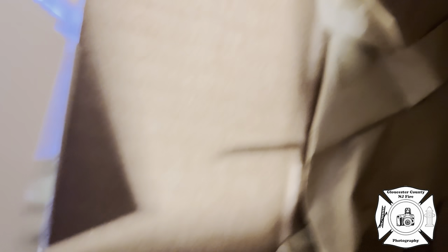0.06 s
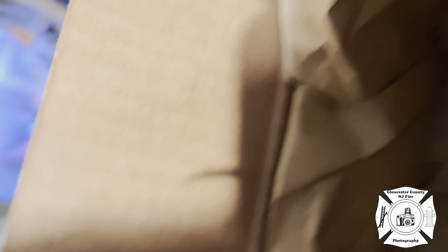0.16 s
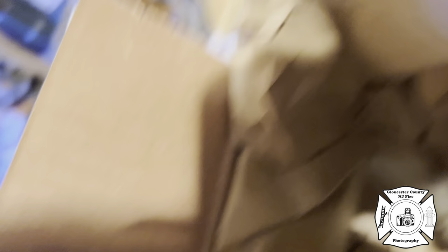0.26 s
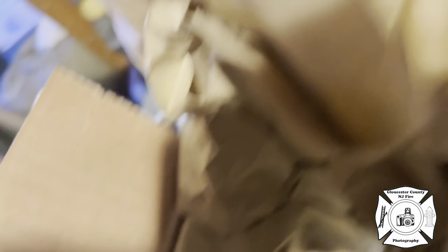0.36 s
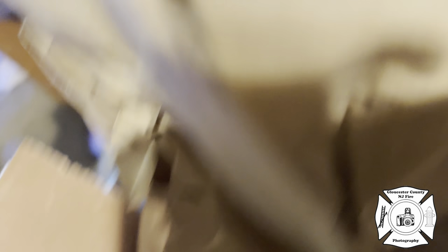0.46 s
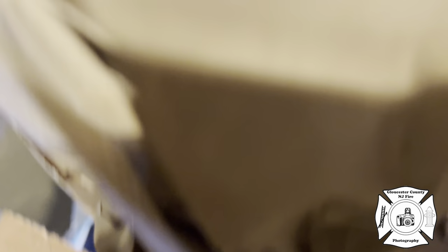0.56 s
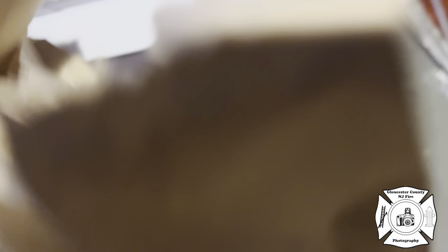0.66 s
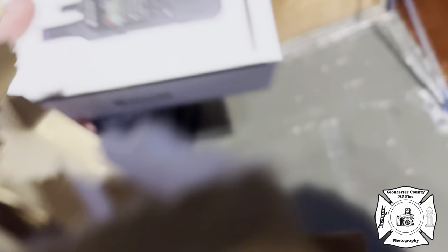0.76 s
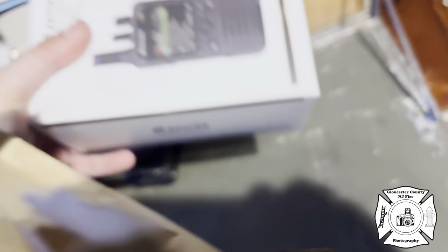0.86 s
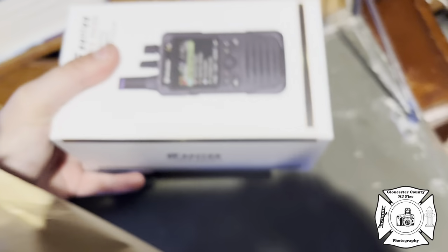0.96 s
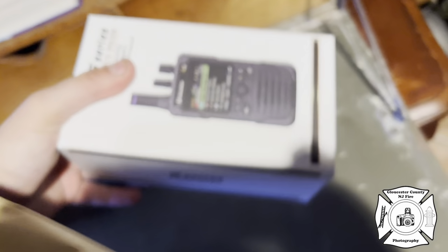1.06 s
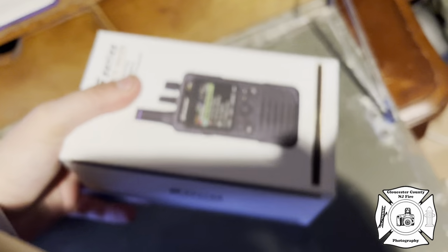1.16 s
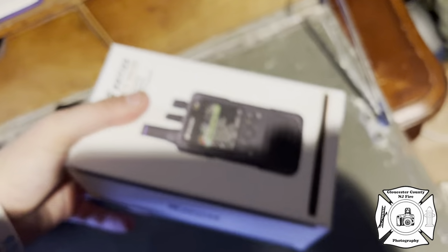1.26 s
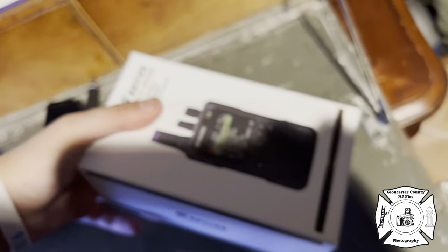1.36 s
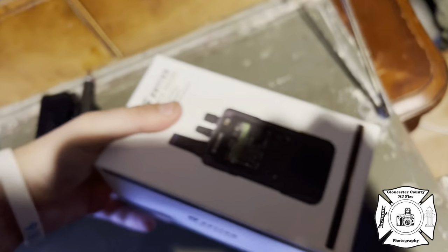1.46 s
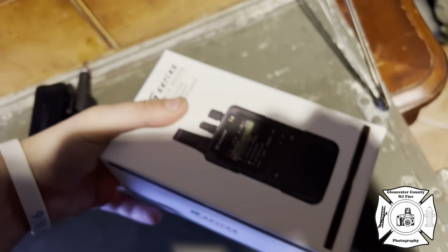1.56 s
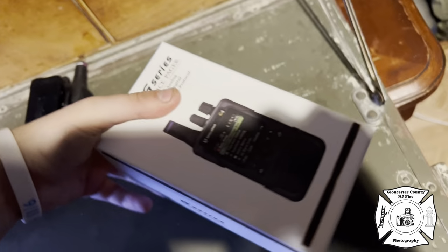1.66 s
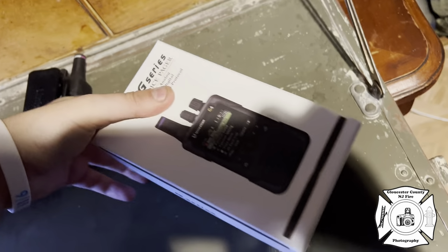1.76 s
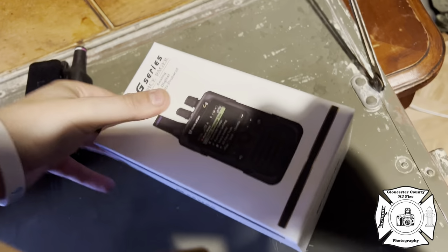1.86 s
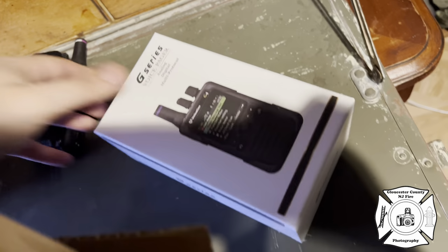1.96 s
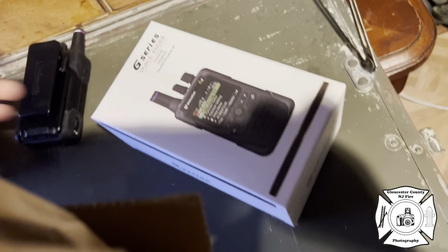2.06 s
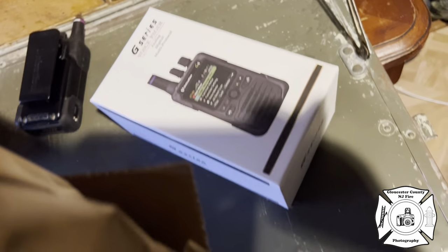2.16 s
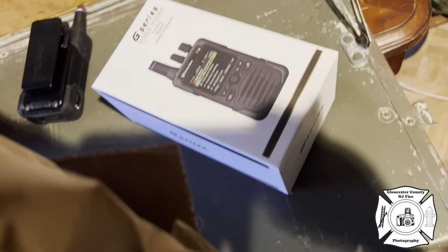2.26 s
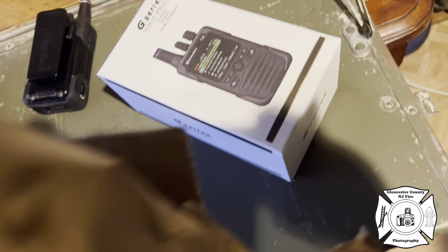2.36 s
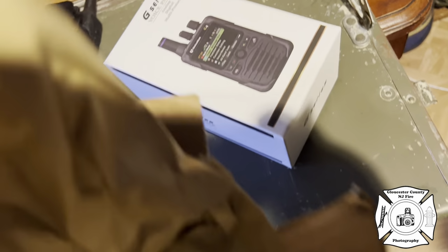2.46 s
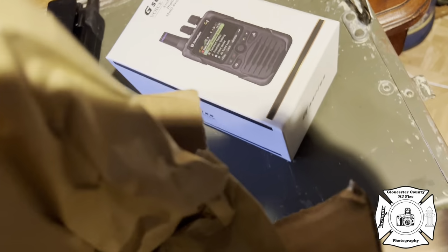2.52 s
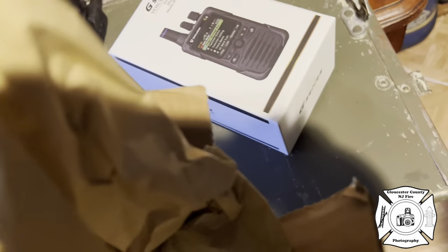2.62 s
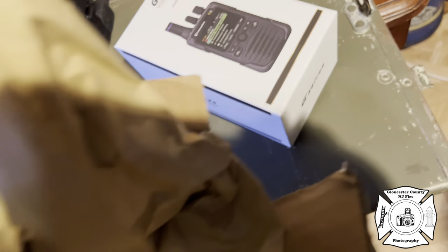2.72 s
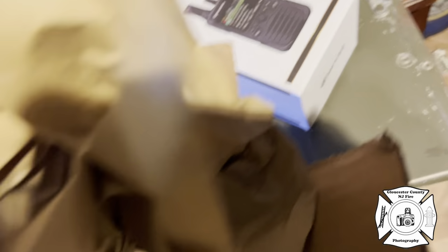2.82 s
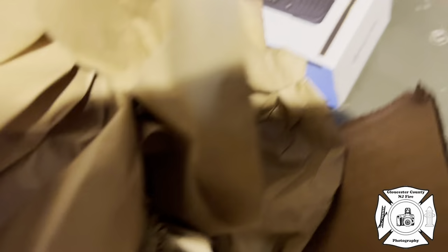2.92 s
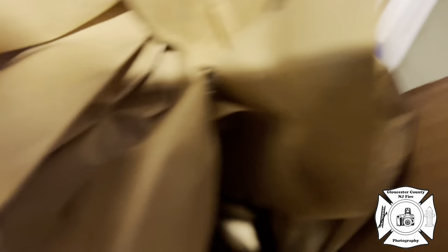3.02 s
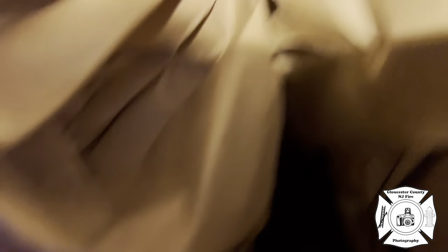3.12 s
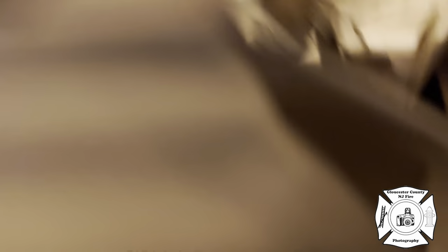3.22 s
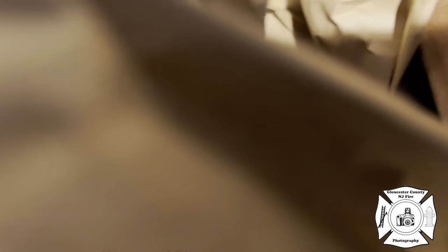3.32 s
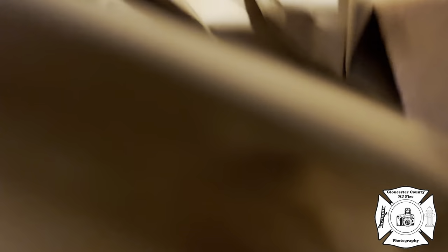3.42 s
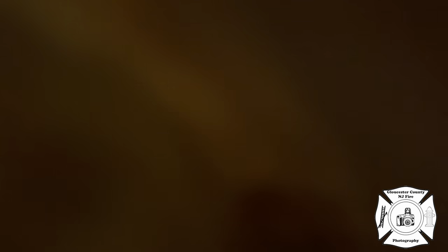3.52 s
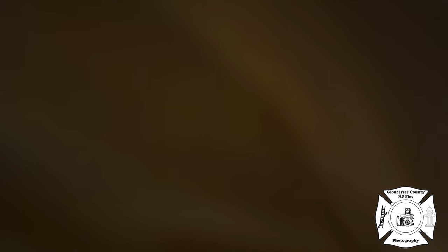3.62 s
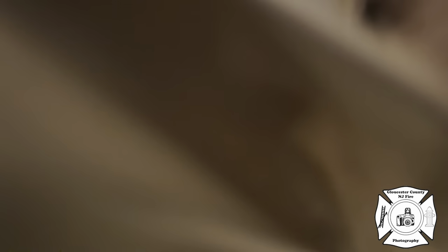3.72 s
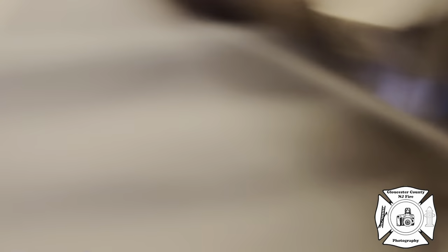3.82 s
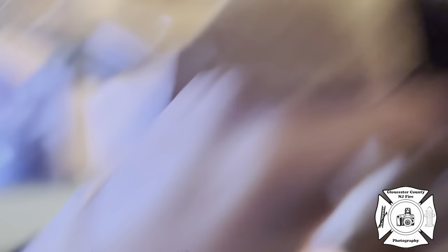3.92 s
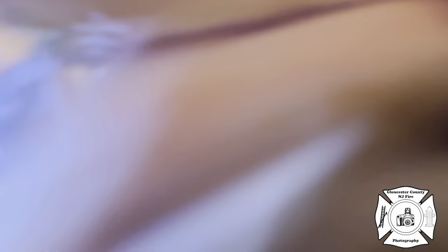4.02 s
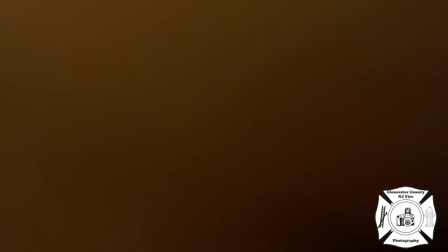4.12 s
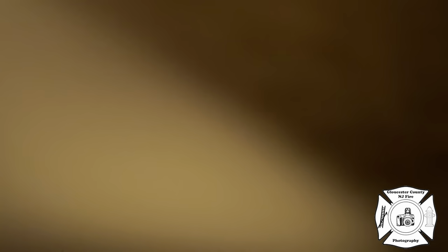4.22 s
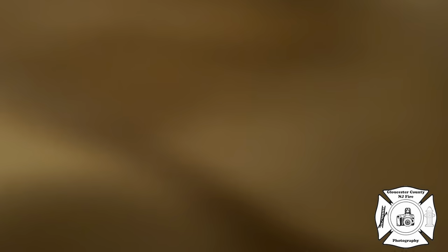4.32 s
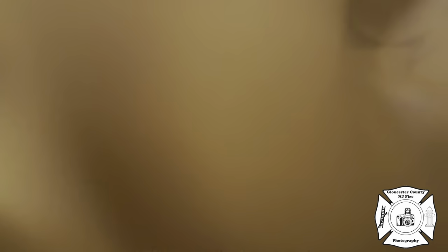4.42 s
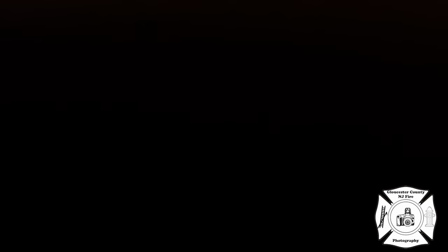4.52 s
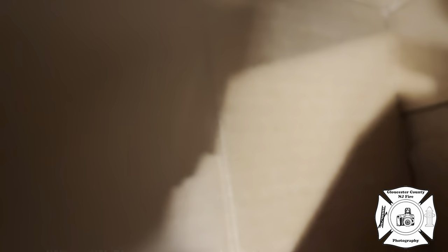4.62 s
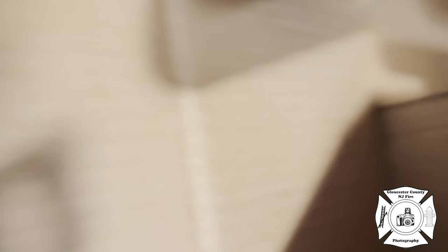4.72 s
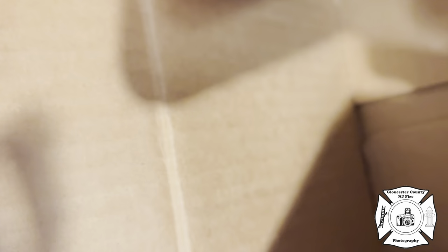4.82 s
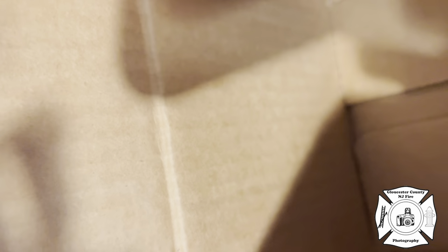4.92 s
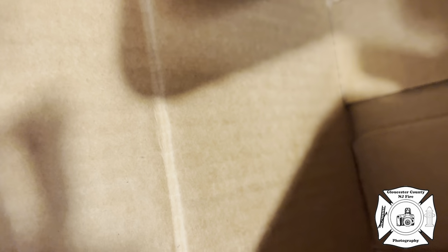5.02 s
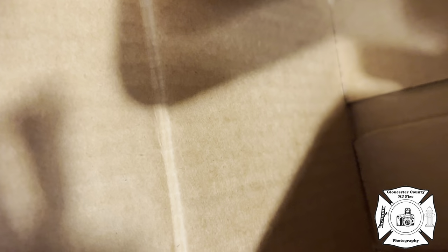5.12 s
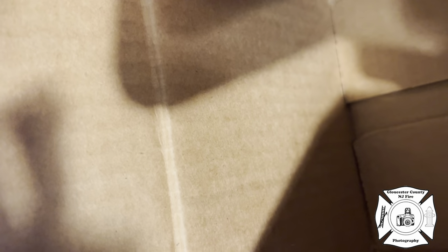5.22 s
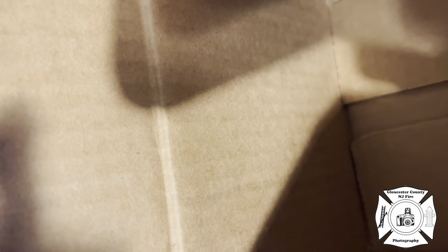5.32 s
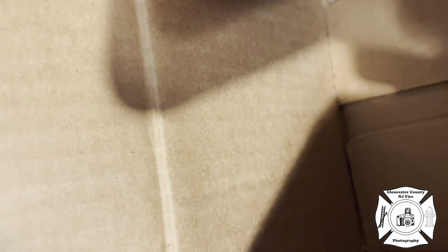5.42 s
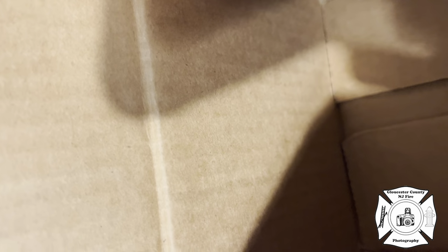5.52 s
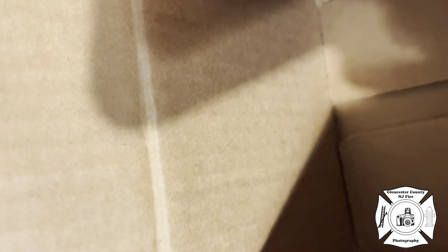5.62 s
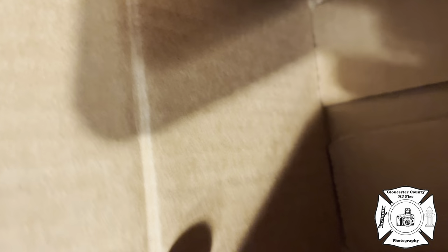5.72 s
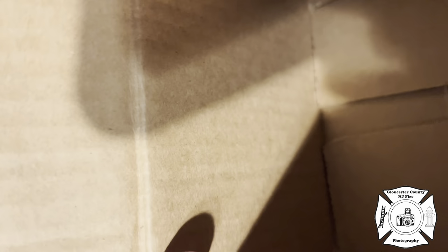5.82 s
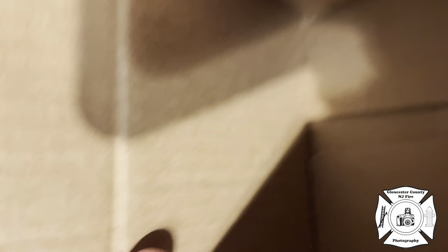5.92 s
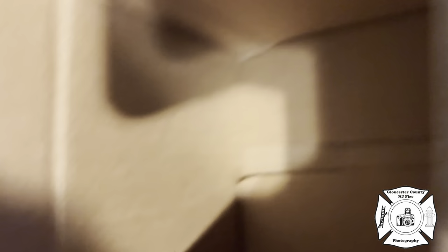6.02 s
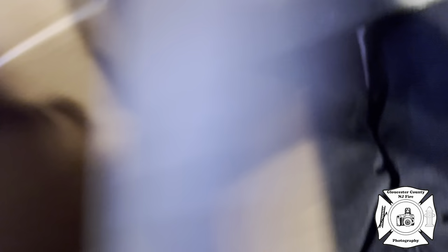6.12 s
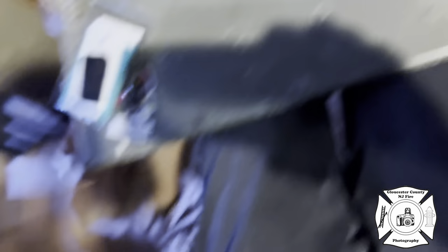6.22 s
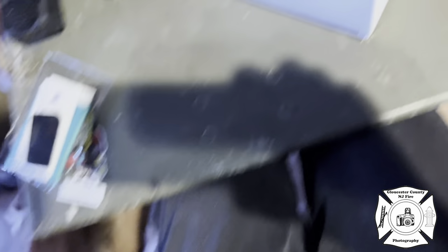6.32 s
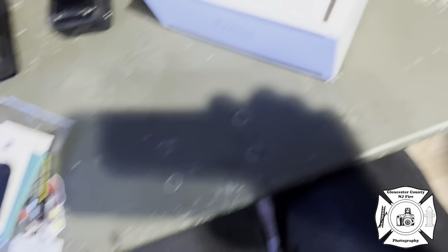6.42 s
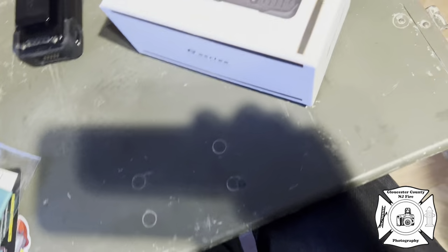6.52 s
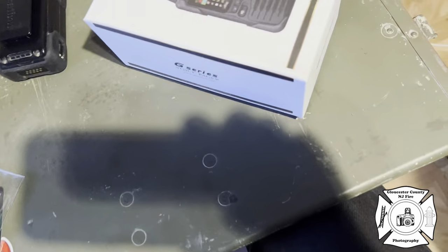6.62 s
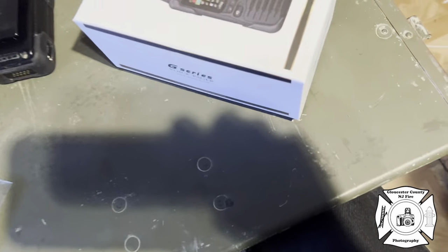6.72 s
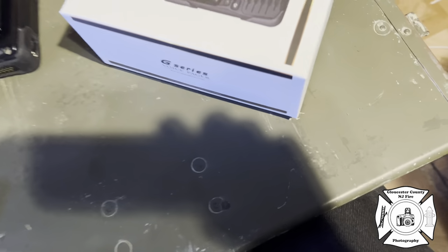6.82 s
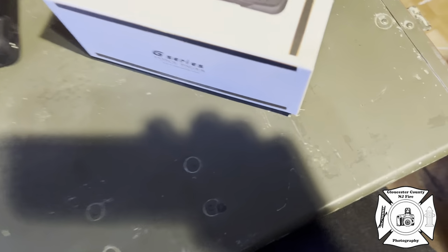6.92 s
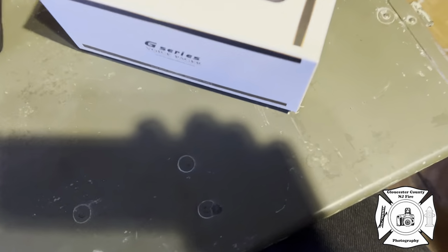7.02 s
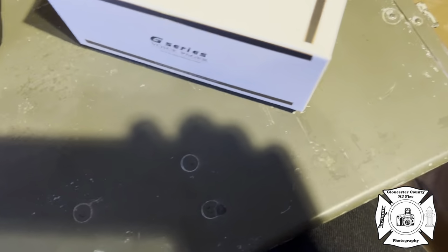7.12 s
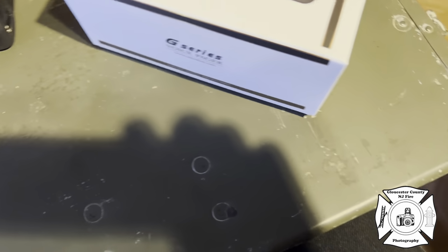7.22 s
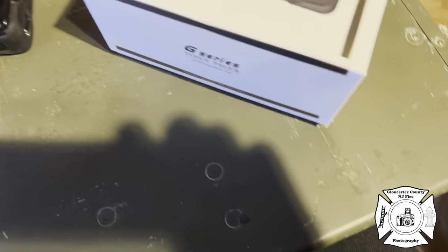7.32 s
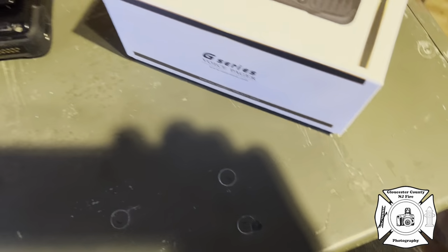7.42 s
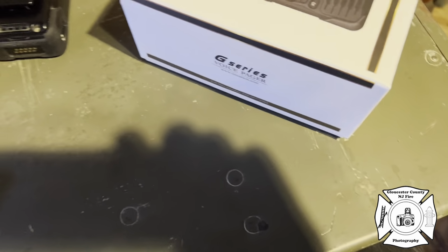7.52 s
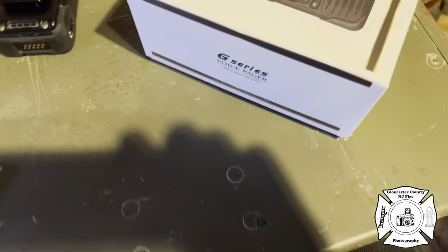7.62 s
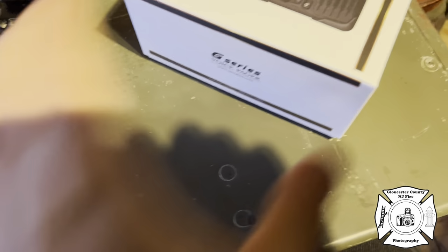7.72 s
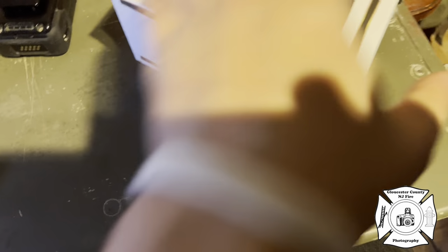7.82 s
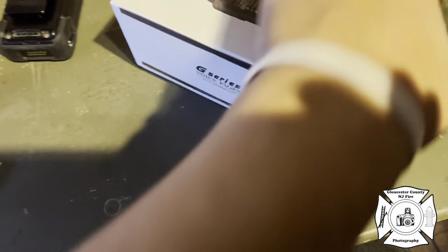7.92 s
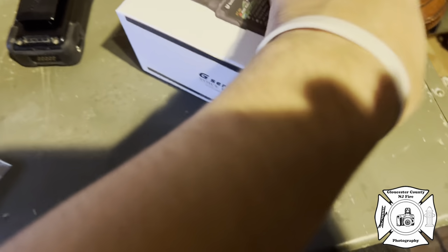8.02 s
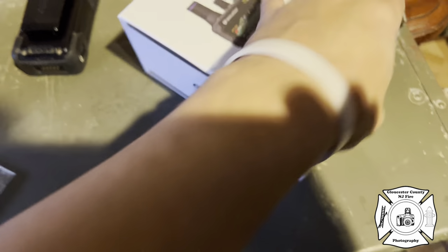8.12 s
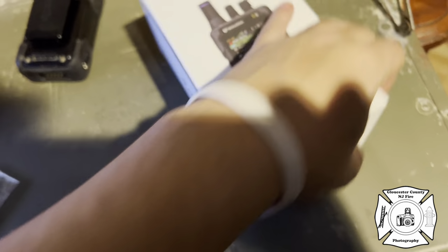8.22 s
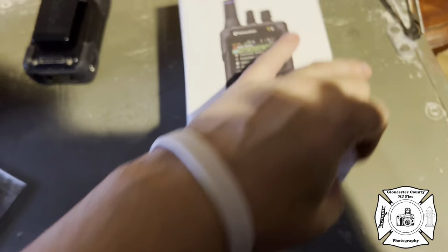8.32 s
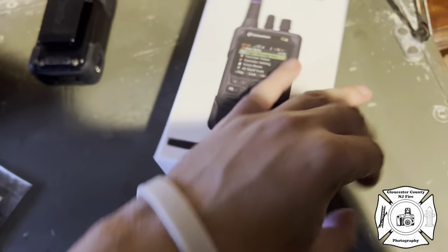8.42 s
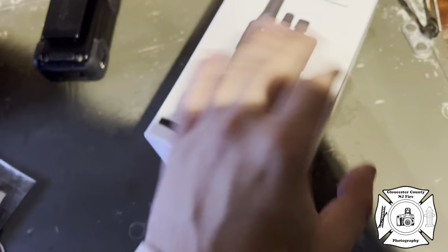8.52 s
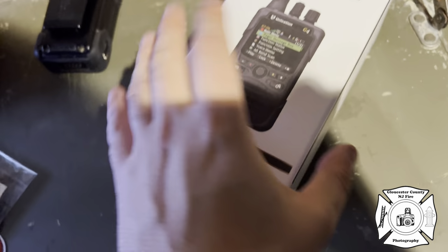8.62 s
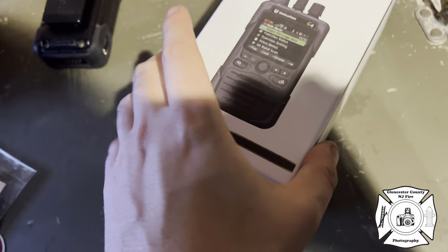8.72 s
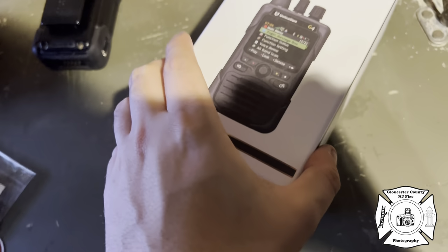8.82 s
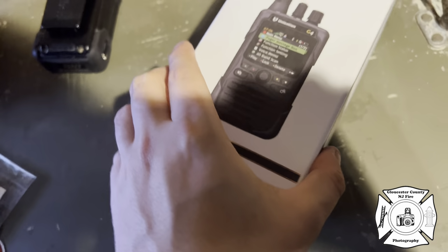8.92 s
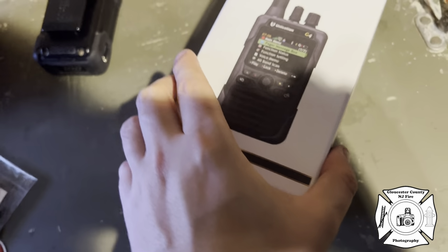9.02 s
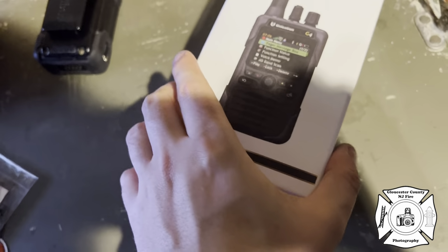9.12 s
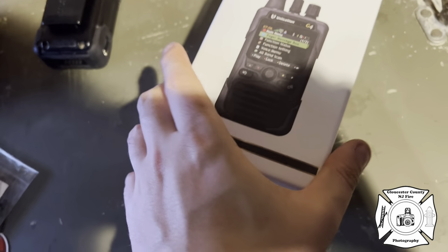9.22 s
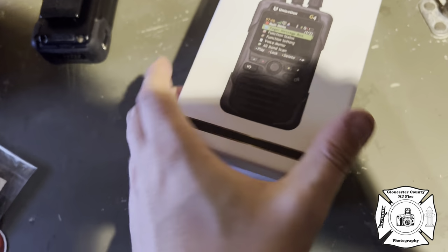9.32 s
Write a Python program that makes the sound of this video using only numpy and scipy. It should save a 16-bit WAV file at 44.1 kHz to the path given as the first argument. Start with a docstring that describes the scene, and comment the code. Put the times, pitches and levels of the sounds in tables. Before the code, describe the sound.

A few cardboard ticks and a small box knock lead into a violent burst of paper crumpling, then quiet scuffs and one dull landing bump.

```python
"""Packing paper drawn from a carton

Stiff kraft paper is pulled out of a cardboard carton, close to the microphones in a small room.
Creases snap as clusters of cracks, the wad crinkles as dense random pops, and big sheets flap and flex.
A small box set on a table and the packing landing with a thud ring as sums of damped modes.
Hands bump, rub and slide the cardboard: damped swings, bursts and filtered friction noise.
A reverberant tail follows all the handling; a low rumble and faint air lie underneath."""
import sys
import numpy as np
from scipy import signal
from scipy.fft import rfft, irfft, next_fast_len
from scipy.io import wavfile
from scipy.ndimage import uniform_filter1d

SR = 44100
rng = np.random.default_rng(int(sys.argv[2]) if len(sys.argv) > 2 else 0)


def materialize(psi):
    """Save the field psi as 16-bit PCM at rate SR to the path in sys.argv[1].

    A 1-D psi becomes a single channel; in a 2-D psi each row is a channel.
    """
    bounded = np.clip(np.atleast_2d(psi).T, -1, 1)
    quanta = np.round(bounded * 32767).astype(np.int16)
    wavfile.write(sys.argv[1], SR, quanta)


N = 412765  # samples

# Levels in dB are relative: each source applies its own gain as well.
# Tugs and shoves at the paper. Each row: start in seconds, length in seconds, crinkle level in dB,
# fine crackle level in dB, flapping sheet level in dB.
TUGS = [(0.0, 0.3, -53.5, -62, -56), (2.309, 0.087, -35.5, -43.5, -38), (2.365, 0.14, -28, -35.5, -29),
        (2.51, 0.16, -35, -46, -35.5), (2.605, 0.17, -30, -39, -35.5), (2.76, 0.18, -24.5, -36.5, -28),
        (2.975, 0.11, -24.5, -34, -27.5), (3.10, 0.15, -28, -38, -30), (3.24, 0.053, -37.5, -45.5, -29),
        (3.305, 0.072, -30.5, -38, -19.5), (3.39, 0.087, -33.5, -45, -27), (3.462, 0.18, -28.5, -35.5, -16),
        (3.63, 0.13, -32, -38, -26), (3.77, 0.14, -35.5, -43, -35), (3.94, 0.12, -33, -38.5, -31.5),
        (4.005, 0.055, -21, -23.5, -15.5), (4.06, 0.091, -23.5, -32.5, -11),
        (4.17, 0.2, -31.5, -40.5, -22.5), (4.37, 0.19, -30, -34.5, -16), (4.55, 0.049, -36, -41.5, -29),
        (4.64, .18, -52, -54, -52.5), (7.07, 0.061, -41.5, -68, -36), (7.23, 0.038, -54, -73, -50.5)]
# The let-go paper creeping and settling. Each row: start in seconds, length in seconds, crinkle level in dB.
SETTLING = [(0.29, 0.14, -63.5), (4.85, 0.66, -66.5), (5.2, 0.17, -61.5), (6.08, 0.17, -59.5),
            (6.25, 0.2, -70.5), (6.42, 0.35, -70), (6.7, 0.37, -64.5), (6.92, 0.11, -60.5),
            (7.14, 0.2, -68.5)]
SETTLE_CRACKLE_DB, SETTLE_FLAP_DB = -9.5, -11.5  # beside its crinkle
# The loudest creases snapping in the wad. Each row: time in seconds, peak level in dB, ring pitch in Hz,
# treble level in dB, left-right difference in dB.
CREASE_SNAPS = [(2.3122, -25, 2140, -16, 3), (2.3203, -27, 1030, -24, 6.5), (2.374, -17.5, 2630, -11, 10),
                (2.384, -12, 2540, -16, 13.5), (2.4076, -11.5, 1200, -15, 8.5), (2.4315, -7, 2480, -13, 4),
                (2.446, -11, 3040, -17, 2), (2.462, -13, 2740, -19, 12), (2.467, -9, 2600, -21, -4),
                (2.4957, -8, 1020, -32, 9), (2.51, -15.5, 2520, -8, -1), (2.553, -20, 3280, -27, 7),
                (2.61, -13.5, 2063, -29, -2), (2.626, -23, 1796, -31, 0.5), (2.662, -16, 2000, -26, -1.5),
                (2.691, -9, 2540, -32, -5), (2.7385, -12, 1110, -11, 1), (2.763, -13.5, 2980, -10, 2),
                (2.768, -3.5, 2630, -17, 1), (2.779, -7.5, 2586, -16, 3.5), (2.79, -7, 1590, -12, -1.5),
                (2.8155, -12, 2530, -25, -1), (2.83, -12.5, 2215, -22, 1.5), (2.8563, -7.5, 2453, -11, 8.5),
                (2.88, -13, 2490, -13, 0), (2.889, -7.5, 1120, -12, 2), (2.896, -5.5, 2420, -14, 9),
                (2.904, -5, 3560, -19, -4), (2.92, -10, 2616, -21, 1.5), (2.931, -6.5, 1620, -11, 0.5),
                (2.96, -25, 1168, -8, 1.5), (2.972, -0.5, 1488, -12, -1), (3.0042, -13, 3400, -29, -3.5),
                (3.014, -12, 2900, -26, -1), (3.0246, -6.5, 3050, -31, -5), (3.049, -5, 1449, -19, -3.5),
                (3.0728, -11, 2870, -14, -4.5), (3.108, -16.5, 2200, -3, -2),
                (3.1416, -12, 2840, -31, -2.5), (3.1763, -15, 2760, -13, 2.5),
                (3.197, -1, 1560, -12.5, 1.5), (3.2258, -16.5, 942, -12, -0.5), (3.249, -10, 1500, -14, -1),
                (3.286, -1.5, 7540, -16.5, 0.5), (3.322, -8.5, 1350, -34, -1), (3.354, -13, 1374, -30, 1.5),
                (3.3661, -3.5, 1407, -10, -4), (3.385, -12.5, 1297, -29, 1.5), (3.447, -16, 920, -9, 10),
                (3.4941, -3.5, 2345, -22, 8), (3.512, -20, 2003, 0, -0.5), (3.532, -3, 1980, -9, 4),
                (3.549, -7, 877, -8, -9), (3.575, -11, 1490, -14, 11.5), (3.581, -11.5, 2500, -1, 2.5),
                (3.6138, -9.5, 2360, -24, 11), (3.6679, -9.5, 900, -30, 7), (3.675, -12.5, 1830, -34, 9.5),
                (3.7258, -14.5, 920, -33, 11.5), (3.7512, -13, 2450, -15, 6.5),
                (3.8317, -19, 1320, -20, -11), (3.8985, -20.5, 2230, -30, -8.5),
                (3.9828, -9.5, 1380, -7, -6.5), (4.0277, -5.5, 1260, -8, -10), (4.0458, -5, 1190, -8, -7.5),
                (4.094, -9, 1004, -24, -2), (4.1264, -9, 1035, -3, 4.5), (4.138, -14, 1030, -28, -1),
                (4.1716, -9.5, 1000, -33, 6), (4.228, -26.5, 1410, -32, -7), (4.243, -6.5, 1860, -12, 0.5),
                (4.2545, -8, 1018, -22, 0.5), (4.372, -16.5, 942, -3, -1), (4.403, -3.5, 1788, -19, 6),
                (4.4212, -8.5, 1073, -12, 6.5), (4.429, -8, 3810, -4, 0), (4.455, -9.5, 1846, -12, 1.5),
                (4.479, -5.5, 890, -13, 8), (4.485, -10, 1917, -5, 2), (4.514, -5, 843, -19, 13),
                (4.556, -11.5, 1410, -13, 10), (4.622, -17, 870, -23, 16)]
# Lesser creases, before the quietest are left out.
CREASES_PER_S, CREASE_OVER_CRINKLE_DB, CREASE_SPREAD_DB = 16, 10, -0.5
CREASE_HZ, CREASE_SPREAD_OCTAVES, CREASE_TREBLE_DB, CREASE_PAN_DB = 2080, 1, -21, 2.5
CREASE_LEAST_DB = -41.5  # paper that barely moves snaps no creases
# Cardboard edges ticking as they catch and let go. Each row: time in seconds, peak level in dB,
# ring pitch in Hz, treble level in dB, left-right difference in dB.
EDGE_TICKS = [(0.0229, -18, 2900, -30, -1), (0.1003, -10, 6100, -14, -2), (0.1157, -23.5, 1770, -20, 11),
              (0.1915, -22, 2180, -30, 5), (0.2004, -15.5, 1860, -36, -2.5), (0.2319, -25, 1500, -15, -6),
              (0.2555, -36, 2600, -23, 0), (0.27, -35, 3200, -20, 2), (0.315, -43, 2600, -16, 0),
              (0.34, -27.5, 1840, -25, 1), (0.4303, -15, 4130, -21.5, -0.5), (0.4883, -25, 5300, -16, -2.5),
              (0.578, -43.5, 1400, -30.5, 1.5), (0.695, -34.5, 1530, -36, -11),
              (0.744, -43.5, 1680, -24, 0), (0.9228, -14.5, 2950, -19, -2), (0.9727, -41.5, 2000, -20, 2),
              (1.215, -50.5, 1780, -20, -1), (1.3165, -18.5, 5670, -21.5, 0.5),
              (1.778, -38.5, 1095, -23.5, -3), (1.8375, -34, 1040, -25, -4.5), (2.159, -49, 1500, -43, 5),
              (5.034, -36.5, 2326, -25, 1), (5.132, -38.5, 3144, -15.5, 5), (5.208, -34, 4280, -8.5, 2.5),
              (5.3344, -40, 3020, -32, 6), (5.455, -47, 1774, -31, 5), (5.801, -35.5, 1300, -29, 0),
              (5.833, -41, 1700, -30, 0), (5.85, -32, 1560, -33, 3), (6.043, -22.5, 7700, -4, 6),
              (6.1508, -37, 1700, -30, -0.5), (6.2372, -23.5, 4100, -8, 0.5),
              (6.4219, -36.5, 2680, -12.5, 5), (6.571, -37.5, 1980, -31.5, 7), (6.8207, -42, 1464, -26, -4),
              (6.84, -38, 3230, -21, 0), (6.931, -34.5, 1260, -10, 9), (6.986, -22.5, 3200, -11.5, -1),
              (7.062, -17.5, 1120, -20, 5), (7.421, -52, 2900, -22, 0), (7.5, -55, 2600, -24, 0),
              (8.023, -35, 1020, -33, -6), (8.064, -54, 2800, -20, -2), (8.717, -54, 1106, -28, -5)]
# Large sheets and panels flexing through. Each row: start in seconds, length in seconds, peak level in dB,
# starting pitch in Hz, ending pitch in Hz.
FLEXES = [(1.495, 0.029, -19, 260, 90), (1.701, 0.028, -35, 306, 90), (3.206, 0.056, -13.5, 262, 55),
          (3.472, 0.036, -5.5, 340.5, 103), (3.553, 0.071, -4.5, 203.5, 45), (3.734, 0.03, -17, 288, 124),
          (4.088, 0.042, -3, 305, 60), (4.401, 0.035, -5, 333, 70), (4.513, 0.055, -2, 324.4, 74.7),
          (4.621, 0.032, -25, 243, 70), (6.894, 0.04, -34.5, 270, 101)]
# Hollow knocks on cardboard. Each row: time in seconds, peak level in dB, pitch in Hz.
THUMPS = [(1.317, -34, 483), (1.493, -24.5, 900), (1.708, -47, 900), (1.781, -38, 600), (1.852, -35, 900),
          (2.407, -27, 460), (2.973, -12, 486), (3.288, -20, 400), (3.355, -14.5, 425), (3.474, -10, 484),
          (3.549, -2.5, 493), (3.584, -12.5, 382), (3.613, -10.5, 470), (3.673, -14.5, 430),
          (4.049, -7.5, 473), (4.061, -6, 385), (4.091, -0.5, 560), (4.137, -1.5, 500), (4.245, -11, 454),
          (4.255, -4.5, 494), (4.377, -7, 433), (4.402, -9.5, 340), (4.483, -8.5, 705), (4.517, -6.5, 564),
          (4.552, -8.5, 360), (4.619, -15, 563), (5.801, -41, 613), (6.041, -34.5, 373),
          (6.236, -36.5, 790), (6.423, -41.5, 600), (8.717, -55.5, 300)]
# Cardboard and sheets buckling with a dull bump. Each row: time in seconds, peak level in dB,
# middle pitch in Hz, number of cycles at that pitch for a decay of 60 dB.
BUMPS = [(0.43, -42.5, 193, 14), (0.58, -45.5, 305, 10.5), (0.796, -51.5, 237, 16), (0.876, -53, 290, 18),
         (1.119, -54, 286, 11), (1.317, -44, 395, 38), (1.779, -39, 320, 19), (1.798, -30.5, 73.4, 16),
         (1.84, -27.5, 318, 9.8), (1.852, -26, 250, 18), (1.863, -20, 70.4, 12), (2.476, -19, 111, 6),
         (2.6, -21, 117, 8.7), (2.934, -19.5, 76, 3.9), (3.092, -16.5, 90.1, 10), (3.328, -17.5, 260, 10),
         (3.356, -10.5, 248, 14), (3.389, -13, 283, 8), (3.501, -9, 257, 19), (3.566, -5, 186, 21),
         (3.65, -18, 150, 9), (3.862, -30, 100, 7), (3.958, -26, 86, 12), (4.013, -8.5, 173, 9.5),
         (4.023, -7, 260, 12), (4.065, -1.5, 209, 6.4), (4.128, -6, 70, 7), (4.154, -2, 298, 12),
         (4.242, -13, 73, 13), (4.255, -9, 308, 9.5), (4.377, -2.5, 367, 16.2), (4.435, -12, 287, 10),
         (4.479, -11, 270, 15), (4.597, -32, 110, 5.5), (4.936, -48.5, 213, 14), (5.623, -26.5, 72.4, 15),
         (5.641, -28.5, 107.3, 36), (5.759, -32.5, 75.6, 12), (5.804, -26, 108, 5.2),
         (6.045, -26.5, 70.4, 8.8), (7.255, -45, 293.5, 76), (8.025, -29.5, 185, 14),
         (8.716, -45, 80.4, 9.4)]
# Flat sheets brushing along the carton. Each row: start in seconds, length in seconds, level in dB.
SLIDES = [(-0.02, 0.2, -48.5), (0.1, 0.13, -47), (0.25, 0.016, -45.5), (5.576, 0.048, -35.5),
          (5.63, 0.11, -48), (6.238, 0.012, -49.5), (6.08, 0.62, -67), (6.422, 0.0096, -65),
          (6.7, 0.04, -58), (6.79, 0.14, -60), (6.92, 0.095, -52), (7.09, 0.038, -42),
          (7.235, 0.023, -52.5), (7.29, 0.018, -68)]
# Hands and cardboard rubbing. Each row: moment of greatest speed in seconds,
# time to speed up or slow down in seconds, scrape level in dB, hiss level in dB.
STROKES = [(0.82, 0.26, -73.5, -83.5), (1.25, 0.54, -80, -84), (1.681, 0.08, -72, -65),
           (1.845, 0.041, -53, -74), (1.93, 0.07, -65, -88), (2.221, 0.15, -71.5, -87),
           (5.75, 0.042, -57, -51), (5.89, 0.06, -57.5, -52.5), (5.975, 0.05, -62, -46.5),
           (6.015, 0.025, -55, -48.5), (6.18, 0.036, -60, -74), (6.439, 0.018, -63, -69),
           (7.71, 0.058, -76.5, -79.5), (7.85, 0.1, -72, -71), (8.02, 0.075, -77, -75),
           (8.137, 0.056, -52.5, -59), (8.28, 0.12, -55, -62.5), (8.45, 0.1, -58, -75),
           (8.79, 0.086, -84, -77.5), (9.0, 0.082, -69, -87), (9.12, 0.06, -91, -72),
           (9.23, 0.038, -89, -74), (9.33, 0.055, -70, -75.5)]
RUB_PAN_DB = -3.5  # left-right difference of the scrape
# Surfaces squeaking or groaning as they slide. Each row: start in seconds, length in seconds,
# starting pitch in Hz, level in dB, glide in octaves, waver as a share of the pitch.
SQUEAKS = [(0.1, 0.12, 1100, -48, -1.7, 0.17), (0.14, 0.058, 1180, -60, -0.91, 0.15),
           (6.268, 0.11, 1680, -69, 0.046, 0.025), (5.736, 0.067, 292, -41, -0.38, 0.095),
           (5.869, 0.085, 250, -43, -0.24, 0.082), (6.506, 0.19, 1930, -58, -0.02, 0.006),
           (7.007, 0.031, 1600, -48.5, -0.079, .02), (7.64, 0.4, 6400, -66.5, -0.11, 0.052)]
# Contacts of the small box with the table. Each row: time in seconds, level in dB.
BOX_HITS = [(1.487, -48.5), (1.4935, -26), (1.5056, -45.5), (1.538, -48)]
# Modes of the box. Each row: frequency in Hz, level in dB, 60 dB decay time of its rattle in seconds.
BOX_MODES = [(102, 1, 0.39), (157, 4, 0.23), (237, -4, 0.25), (360, 7, 0.094), (455, -20, 0.16),
             (890, 13.5, 0.055), (1200, -11, 0.068), (1450, -12, 0.06), (2280, 8, 0.017), (3050, -6, 0.034)]
# Contacts of the packing as it lands. Each row: time in seconds, level in dB.
LANDING_HITS = [(7.063, -15.5), (7.070, -25), (7.103, -27.5), (7.13, -36.5)]
# Modes of the landing. Each row: frequency in Hz, level in dB, 60 dB decay time of its rattle in seconds.
LANDING_MODES = [(60, -14, 0.45), (116, -13, 0.36), (214, -8, 0.28), (250, 8, 0.11), (377, -19, 0.18),
                 (450, -5.5, 0.13), (507, 8, 0.048), (660, -9, 0.073), (750, -27, 0.057), (1120, -8, 0.019),
                 (1500, -41, 0.0784)]
# Level of the background rumble, in two stretches. Each row: time in seconds, level in dB.
RUMBLE = [
    [(0.0, -57), (0.56, -75.5), (1.23, -80), (1.39, -68), (1.65, -59.5), (1.92, -44), (2.13, -62.5),
     (2.28, -60.5)],
    [(4.88, -82), (5.47, -86), (5.8, -49), (6.7, -73), (6.95, -54.5), (7.09, -51), (7.51, -67), (9.36, -67)],
]
AMBIENCE_DB = -76

# Filter spectra of the sources. Each row: frequency in Hz, level in dB per Hz.
CRINKLE_SPECTRUM = [(250, -17.5), (600, -7), (1000, 1.5), (1500, -0.5), (2800, -2.5), (4000, -6),
                    (5500, -8.5), (8000, -22.5), (16000, -37)]
CRACKLE_SPECTRUM = [(1500, -14.5), (3500, -2.5), (5000, 2), (6300, 4), (8000, 4), (10000, -10.5),
                    (13000, 0), (15000, -13), (16500, -21.5)]
FLAP_SPECTRUM = [(25, -20.5), (48, 1), (70, 2.5), (110, -0.5), (200, -5.5), (320, -7), (450, -8.5),
                 (700, -18), (1200, -24.5), (3000, -58.5)]
SNAP_SPECTRUM = [(100, -12.5), (400, -9), (650, -4.5), (1200, -1.5), (3000, -4), (6000, -4), (8000, 1),
                 (10000, -4), (16000, -15)]
SLIDE_SPECTRUM = [(300, -11.5), (600, -5), (1100, -0.5), (2000, -2.5), (3200, -2.5), (4500, -6.5),
                  (8000, -6), (10000, -16.5), (13000, -11.5), (16000, -21.5)]
SCRAPE_SPECTRUM = [(60, -26), (250, 4), (520, -5.5), (900, 4), (1500, 1.5), (2300, -3), (3200, -9.5),
                   (6000, -20), (16000, -28)]
HISS_SPECTRUM = [(1000, -13), (2800, -8.5), (4500, -9), (8000, -4.5), (10000, -13.5), (14500, -5.5),
                 (16500, -36)]
RUMBLE_SPECTRUM = [(20, -36.5), (45, -7), (65, -2), (90, -4), (130, -13.5), (250, -22), (600, -31),
                   (2000, -63)]
AMBIENCE_SPECTRUM = [(60, -3), (300, -3.5), (600, -18), (1400, -7), (2300, -7.5), (3200, -13.5),
                     (8000, -24), (16000, -32.5)]
# Correlation of the noise in the two ears. Each row: frequency in Hz, left-right likeness from -1 to 1.
LIKENESS = [(60, 0.85), (250, 0.94), (500, 0.73), (1000, 0.42), (2000, 0.1), (4000, 0.9), (8000, 0.21),
            (14000, 0.86)]
# Response of the microphone pair. Each row: frequency in Hz, left-right difference in dB.
BALANCE_DB = [(250, 0), (500, 2), (900, 1.5), (1700, -2.5), (3000, -1), (5000, 10), (7500, 4)]
ROOM_T60_S, CUTOFF_HZ = 0.07, 16000

HALVES = np.array([[0.5], [-0.5]])  # shares a left-right difference between the ears


def from_db(db):
    """Amplitude ratio: 20 dB make a factor of ten."""
    return 10 ** (np.asarray(db) / 20)


def rms_one(x):
    """Normalization to unit root-mean-square amplitude."""
    return x / np.sqrt(np.mean(x ** 2) + 1e-20)


def at_hz(points, hz):
    """Interpolation of a spectrum along a logarithmic frequency axis."""
    knots, values = np.transpose(points)
    return np.interp(np.log(hz + 1e-3), np.log(knots), values)


def add(out, s, sound):
    """Superposition: mix a sound in from time s in seconds."""
    start = max(int(s * SR), 0)
    out[:, start:start + sound.shape[1]] += sound[:, :N - start]


def drift(rate):
    """Random fluctuation: normal deviates, rate per second, joined by straight lines."""
    knots = rng.standard_normal(4000)
    return np.interp(np.arange(N) / SR * rate, np.arange(len(knots)), knots)


def colour(x, spectrum, size=4096):
    """Minimum-phase filtering: the folded cepstrum gives a causal response with the given spectrum."""
    gain = from_db(at_hz(spectrum, np.fft.rfftfreq(size, 1 / SR)))
    cepstrum = irfft(np.log(gain))
    cepstrum[1:size // 2] *= 2
    cepstrum[size // 2 + 1:] = 0
    response = irfft(np.exp(rfft(cepstrum)))
    return signal.oaconvolve(x, response[None], axes=1)[:, :x.shape[1]]


def stereo_noise(size):
    """Partial coherence: white noise whose correlation between the ears depends on frequency."""
    padded = next_fast_len(size, True)
    alike = np.clip(at_hz(LIKENESS, np.fft.rfftfreq(padded, 1 / SR)), -.99, .99)
    mid, side = rfft(rng.standard_normal((2, padded)))
    ears = np.sqrt(1 + alike) * mid + np.sqrt(1 - alike) * side * [[1], [-1]]
    return irfft(ears, padded)[:, :size] / np.sqrt(2)


def resonance(x, hz, q):
    """Simple resonance: a band-pass with unit gain at its peak."""
    return signal.lfilter(*signal.iirpeak(min(hz, SR / 3), max(q, 1), fs=SR), x)


def steady(x, window_s):
    """Level equalization: near-unit power over each window, leaving the finer grain."""
    size = int(window_s * SR)
    power = uniform_filter1d(uniform_filter1d(np.mean(x ** 2, axis=0), size), size // 2)
    return x / np.sqrt(np.abs(power) + 1e-4 * power.mean())


def swells(rows, attack_s, sag_db_per_s, release_db_per_s):
    """Envelope of a movement: it takes hold, drifts in level and dies away; one gain per dB column."""
    t, power = np.arange(0, N, 32) / SR, 0
    for start, length, *levels_db in rows:
        age = np.maximum(t - start, 0)
        overtime = np.maximum(age - length, 0)
        shape = np.minimum(age / attack_s, 1) * from_db(-sag_db_per_s * age - release_db_per_s * overtime)
        power = power + np.outer(from_db(levels_db), shape) ** 2
    return [np.interp(np.arange(N) / SR, t, np.sqrt(p)) for p in power]


def pop(hz, t60, q, ring_db, tail_db, tail_t60, size=3072):
    """Impulsive excitation: one flipping facet cracks, rings, and scatters through the folds."""
    t = np.arange(size) / SR
    noise = stereo_noise(size)
    crack = noise * from_db(-60 * t / t60)
    ring = from_db(ring_db) * resonance(crack, hz, q)
    return crack + ring + noise * from_db(tail_db - 60 * t / tail_t60)


def grains(per_s, spread_db, low_hz, high_hz, t60, clump_db, ring_db, count=18):
    """Random point process: clumped pops of uneven size, dealt to facets of different pitch."""
    born = np.flatnonzero(rng.random(N) < per_s * from_db(clump_db * drift(45)) / SR)
    sizes = from_db(spread_db * np.minimum(rng.exponential(1, N), 4.5)) * rng.choice([-1, 1], N)
    facet, out = rng.integers(0, count, N), np.zeros((2, N))
    for k, hz in enumerate(np.geomspace(low_hz, high_hz, count)):
        clicks, mine = np.zeros(N), born[facet[born] == k]
        clicks[mine] = sizes[mine]
        shape = rms_one(pop(hz, t60, q=10, ring_db=ring_db, tail_db=-22.0, tail_t60=0.11))
        out += signal.oaconvolve(clicks[None], shape, axes=1)[:, :N]
    return out


def folds(x, echo, delay_s, sway):
    """Comb filtering: a moving sheet reflects sound into each ear after a wandering delay."""
    n, shared = np.arange(N), drift(6)
    ears = []
    for ear in x:
        delay = SR * delay_s * np.exp(sway * (shared + 0.13 * drift(6)))
        ears.append(ear + echo * np.interp(n - delay, n, ear))
    return np.array(ears)


def paper_motion():
    """Superposed motions: gains of crinkle, fine crackle and flap from tugs and settling."""
    crinkle, crackle, flap = swells(TUGS, attack_s=0.014, sag_db_per_s=10, release_db_per_s=331)
    # the negative sag makes each creep grow until its release
    creep, = swells(SETTLING, attack_s=0.048, sag_db_per_s=-2.5, release_db_per_s=199)
    return crinkle + creep, crackle + from_db(SETTLE_CRACKLE_DB) * creep, flap + from_db(SETTLE_FLAP_DB) * creep


def paper(crinkle, crackle, flap):
    """Crumpling noise: a harder pull flips more facets, while whole sheets boom underneath."""
    effort = crinkle / crinkle.max()
    pops = grains(110 + 620 * np.sqrt(effort), spread_db=3.5, low_hz=805, high_hz=9350,
                  t60=0.008, clump_db=5.5, ring_db=10)
    brushing = from_db(-5.5) * stereo_noise(N)  # sheets sliding over each other
    rustle = folds(steady(pops, 0.36) + brushing, echo=0.36, delay_s=.00035, sway=0.35)
    rustle = folds(rustle, echo=0.79, delay_s=.0024, sway=.2)
    booms = grains(400, spread_db=3.5, low_hz=87.0, high_hz=740, t60=0.027, clump_db=2, ring_db=15.5, count=26)
    return (from_db(1.85) * crinkle * steady(colour(rustle, CRINKLE_SPECTRUM), 0.19)
            + from_db(3.0) * crackle * steady(colour(rustle, CRACKLE_SPECTRUM), 0.03)
            + from_db(1.06) * flap * steady(colour(booms, FLAP_SPECTRUM), 0.052))


def lesser_creases(crinkle):
    """Random buckling: snaps whose level follows the crinkle gain; rows as in CREASE_SNAPS."""
    count = int(CREASES_PER_S * N / SR)
    moments, chance = rng.random(count), rng.standard_normal((count, 4))
    rows = []
    for moment, (size, pitch, treble, side) in zip(moments, chance):
        crinkle_db = 20 * np.log10(crinkle[int(moment * N)] + 1e-9)
        db = crinkle_db + CREASE_OVER_CRINKLE_DB + CREASE_SPREAD_DB * size
        hz = CREASE_HZ * 2 ** (CREASE_SPREAD_OCTAVES * pitch)
        rows.append((moment * N / SR, db, hz, CREASE_TREBLE_DB + 5 * treble, CREASE_PAN_DB * side))
    return [row for row in rows if row[1] > CREASE_LEAST_DB]


def snaps(rows, gain_db, t60, q, ring_db, cluster_db, tail_db, tail_t60, rise_s):
    """Sudden release: a crease or edge gives in tiny cracks around one pitched snap."""
    lead_s = 0.0033  # from the start of the cluster to the snap
    out = np.zeros((2, N))
    rise = 1 - np.exp(-np.arange(5120) / SR / rise_s)
    for s, db, hz, treble_db, pan_db in rows:
        # faint snaps lie deep in the carton and scatter more
        scatter_db = tail_db + 0.34 * max(-db - 14.0, 0)
        crack = np.zeros((2, SR // 8))
        add(crack, lead_s, rise * pop(hz, t60, q, ring_db, scatter_db, tail_t60, size=len(rise)))
        hard_edge = pop(hz, t60=0.006, q=2.6, ring_db=-2, tail_db=-41.0, tail_t60=.02)
        add(crack, lead_s + rise_s, from_db(2.5) * hard_edge)
        for start, size in rng.random((6, 2)):
            tiny = pop(hz, t60=0.018, q=1.7, ring_db=16.0, tail_db=-31.0, tail_t60=.03)
            add(crack, 2 * lead_s * start, start * size * from_db(cluster_db) * tiny)
        shelf_db = np.clip(treble_db + 6.5, -22, 8)
        shelf = [(3000, 0.013), (8000, shelf_db), (14000, 0.22 * shelf_db)]
        crack = colour(colour(crack, SNAP_SPECTRUM), shelf, size=512)
        # little is radiated far below the ring pitch
        crack = signal.lfilter(*signal.butter(2, min(0.37 * hz, 900), "high", fs=SR), crack)
        height = 3.13 * np.sqrt(np.sum(crack ** 2) / (2 * 0.0028 * SR))  # peak estimated from the energy
        add(out, s - lead_s, from_db(db + gain_db + pan_db * HALVES) * crack / height)
    return out


def flexes():
    """Loss of tension: a bowed sheet swings through, its pitch falling under one swell, with a puff of air."""
    out = np.zeros((2, N))
    for s, length, db, start_hz, end_hz in FLEXES:
        size = int(length * SR)
        phase = 2 * np.pi * np.cumsum(np.geomspace(start_hz, end_hz, size)) / SR
        # the swell peaks at 47 % of its length
        swell = np.sin(np.pi * np.interp(np.linspace(0, 1, size), [0, 0.47, 1], [0, .5, 1]))
        puff = rms_one(colour(stereo_noise(SR // 4), FLAP_SPECTRUM))[:, -size:]
        swing = np.sin(phase) + from_db(-14) * np.sin(1.62 * phase)
        whoomp = swell * (swing + from_db(-11) * puff)
        add(out, s, from_db(db) * whoomp / np.abs(whoomp).max())
    return out


def thumps():
    """Heavy damping: a knock on a cardboard wall gives a short hollow burst with one overtone."""
    out, t = np.zeros((2, N)), np.arange(SR // 4) / SR
    for s, db, hz in THUMPS:
        push = stereo_noise(len(t)) * from_db(-60 * t / 0.039) * (1 - np.exp(-t / 0.001))
        thump = 0
        for mode_hz, mode_db in ((hz, 0), (2.3 * hz, -6.5)):
            mode = resonance(resonance(push, mode_hz, q=1.3), mode_hz, q=1.3)
            thump = thump + from_db(mode_db) * mode
        add(out, s, from_db(db - 1.0) * thump / np.abs(thump).max())
    return out


def bumps():
    """Panel vibration: the lowest mode and an overtone sink in pitch as the panel slackens, with a dull puff."""
    out, t = np.zeros((2, N)), np.arange(SR // 2) / SR
    for s, db, hz, swings in BUMPS:
        puff = rms_one(resonance(colour(stereo_noise(len(t)), FLAP_SPECTRUM), hz, q=1))
        pitch = hz * (1 + 0.059 * (2 * np.exp(-t / 0.027) - 1))
        phase = 2 * np.pi * np.cumsum(pitch) / SR
        swing = np.sin(phase) + from_db(-13) * np.sin(1.62 * phase)
        decay = from_db(-60 * t * hz / swings)
        bump = (swing + from_db(-5) * puff) * decay * (1 - np.exp(-t / 0.0034))
        add(out, s, from_db(db) * bump / np.abs(bump).max())
    return out


def sliding():
    """Friction noise: a flat sheet brushes evenly along the carton, coloured by the shifting gap."""
    gain, = swells(SLIDES, attack_s=0.0059, sag_db_per_s=10.5, release_db_per_s=265.0)
    fibres = rms_one(grains(3000, spread_db=4.5, low_hz=900, high_hz=8000, t60=0.0027, clump_db=5.5, ring_db=2.0))
    brushing = folds(fibres + stereo_noise(N), echo=.45, delay_s=.0014, sway=.15)
    return gain * rms_one(colour(brushing, SLIDE_SPECTRUM))


def stroke_speed():
    """Bell-shaped velocity: a hand speeds up and slows down; gains of the scrape and of the hiss."""
    t, power = np.arange(0, N, 32) / SR, 0
    for middle, ramp_s, *levels_db in STROKES:
        speed = np.exp(-((t - middle) / ramp_s) ** 2)
        power = power + np.outer(from_db(levels_db), speed) ** 2
    return [np.interp(np.arange(N) / SR, t, np.sqrt(p + 1e-20)) for p in power]


def rubbing():
    """Stick-slip of fibres: skin and cardboard slide with a fine, dense grain."""
    scrape, hiss = stroke_speed()
    slips = rms_one(grains(2200, spread_db=3.0, low_hz=727, high_hz=8200, t60=0.0026, clump_db=3, ring_db=8.5))
    slips = folds(slips + from_db(3.0) * stereo_noise(N), echo=0.35, delay_s=0.0022, sway=0.28)
    return (from_db(3.5 + RUB_PAN_DB * HALVES) * scrape * rms_one(colour(slips, SCRAPE_SPECTRUM))
            + from_db(4.0) * hiss * rms_one(colour(slips, HISS_SPECTRUM)))


def squeaks():
    """Stick-slip oscillation: a sliding surface sounds briefly on one wavering, gliding pitch."""
    out = np.zeros((2, N))
    for s, length, hz, db, glide, waver in SQUEAKS:
        size = int(length * SR)
        pitch = hz * 2 ** np.linspace(0, glide, size) * (1 + waver * drift(680)[:size])
        gain = from_db(db + 1.7 * drift(200)[:size])[None] * np.hanning(size)
        add(out, s, gain * np.sin(2 * np.pi * np.cumsum(pitch) / SR))
    return out


def knocks(hits, modes, crunch_db, crunch_t60, rattle, attack_s):
    """Modal excitation: each contact rings the modes; loose contents rattle them and the cardboard crunches."""
    out, t = np.zeros((2, N)), np.arange(SR // 2) / SR
    for s, db in hits:
        crunch = rms_one(colour(stereo_noise(len(t)), SCRAPE_SPECTRUM))
        sound = from_db(crunch_db - 60 * t / crunch_t60) * crunch
        shaking = stereo_noise(len(t))
        for hz, mode_db, t60 in modes:
            tone = np.sin(2 * np.pi * hz * t) * np.exp(-t / t60 * 4)  # dies sooner than the rattle
            shaken = rms_one(resonance(resonance(shaking, hz, q=4.5), hz, q=4.5))
            sound += from_db(mode_db - 60 * t / t60) * (tone + rattle * shaken)
        add(out, s, from_db(db) * sound * (1 - np.exp(-t / attack_s)))
    return out


def room(x, wet_db, first_echo_s):
    """Diffuse reverberation: nearby furniture and walls return a short, dull tail."""
    t = np.arange(SR // 2) / SR
    tail = stereo_noise(len(t)) * from_db(-60 * t / ROOM_T60_S) * (t > first_echo_s)
    tail = tail / np.sqrt(np.sum(tail ** 2) / 2)
    tail = colour(tail, [(100, 3.5), (3000, 3.5), (7000, -4.0), (15000, -12.0)])
    return x + from_db(wet_db) * signal.oaconvolve(x, tail, axes=1)[:, :N]


def background():
    """Background noise: a low rumble whose level comes and goes, and the faint air of the room."""
    rumble = from_db(np.interp(np.arange(N) / SR, *np.concatenate(RUMBLE).T))
    return (from_db(4.5) * rumble * rms_one(colour(stereo_noise(N), RUMBLE_SPECTRUM))
            + from_db(AMBIENCE_DB) * rms_one(colour(stereo_noise(N), AMBIENCE_SPECTRUM)))


def scene():
    """Superposition of all the handling in the room over the background."""
    crinkle, crackle, flap = paper_motion()
    handling = paper(crinkle, crackle, flap)
    handling += snaps(CREASE_SNAPS + lesser_creases(crinkle), gain_db=0.5, t60=0.014, q=6.5, ring_db=9,
                      cluster_db=-18.0, tail_db=-29, tail_t60=0.15, rise_s=0.00032)
    handling += snaps(EDGE_TICKS, gain_db=2.0, t60=0.02, q=6.8, ring_db=12.5,
                      cluster_db=-8.5, tail_db=-22.0, tail_t60=0.15, rise_s=0.00099)
    handling += flexes() + thumps() + bumps() + sliding() + rubbing() + squeaks()
    handling += knocks(BOX_HITS, BOX_MODES, crunch_db=1.0, crunch_t60=0.015, rattle=0.4, attack_s=0.003)
    handling += knocks(LANDING_HITS, LANDING_MODES, crunch_db=-10, crunch_t60=0.084, rattle=0.96, attack_s=0.0051)
    return room(handling, wet_db=-18.0, first_echo_s=0.0059) + background()


def record(dry):
    """Stereo colour: unequal ears, one treble band wide and opposite in the two ears; rounded peaks, a cut top."""
    ears = []
    for k, sign in enumerate((1, -1)):
        response = [(hz, sign * db / 2) for hz, db in BALANCE_DB]
        ears.append(colour(dry[[k]], response, size=1024)[0])
    mid, side = (ears[0] + ears[1]) / 2, (ears[0] - ears[1]) / 2
    # moving the band from mid to side makes it opposite in the two ears, and wide
    band_hz = [9000, 11300]
    opposed = signal.sosfilt(signal.butter(2, band_hz, "band", fs=SR, output="sos"), mid)
    mid = signal.sosfilt(signal.butter(2, band_hz, "bandstop", fs=SR, output="sos"), mid)
    side = side + opposed
    rounded = .95 * np.tanh(np.array([mid + side, mid - side]) / .95)
    return signal.sosfilt(signal.ellip(10, .1, 100, CUTOFF_HZ, fs=SR, output="sos"), rounded)


dry = scene()
out = record(dry)
materialize(out)
```